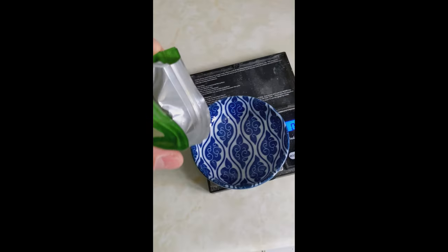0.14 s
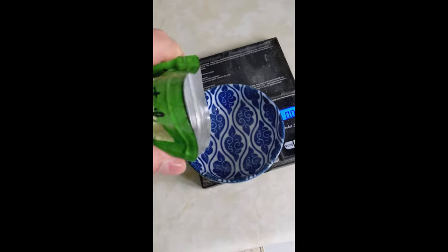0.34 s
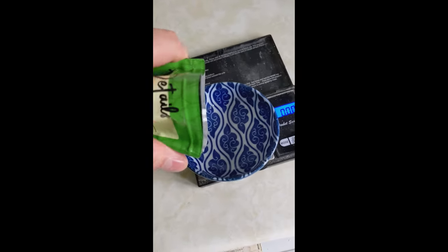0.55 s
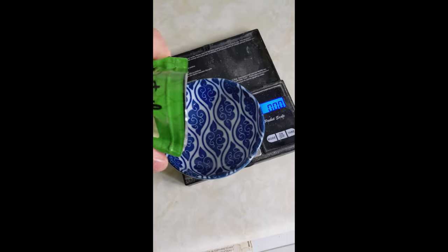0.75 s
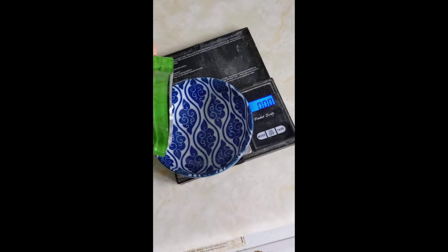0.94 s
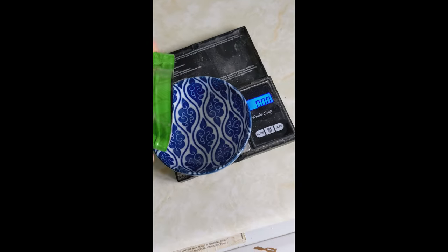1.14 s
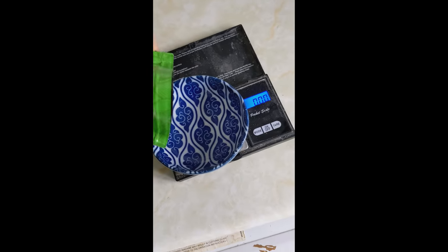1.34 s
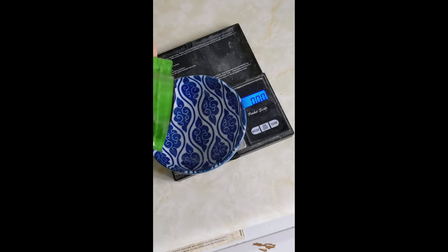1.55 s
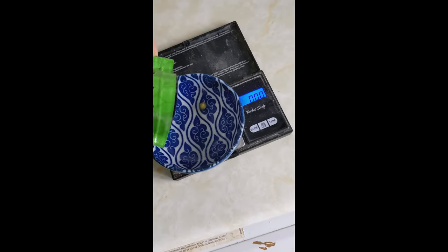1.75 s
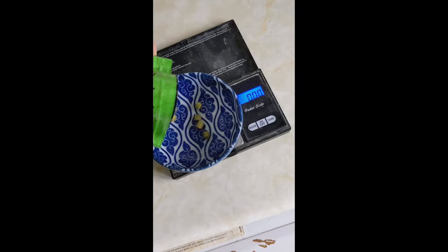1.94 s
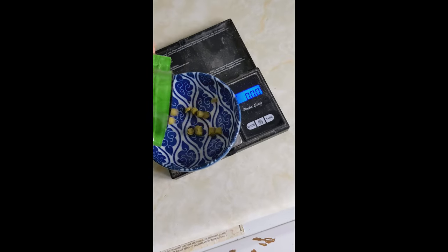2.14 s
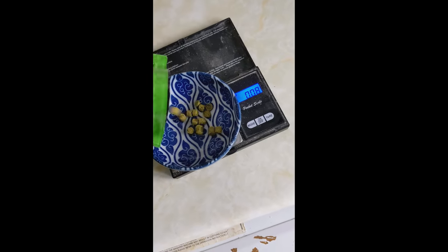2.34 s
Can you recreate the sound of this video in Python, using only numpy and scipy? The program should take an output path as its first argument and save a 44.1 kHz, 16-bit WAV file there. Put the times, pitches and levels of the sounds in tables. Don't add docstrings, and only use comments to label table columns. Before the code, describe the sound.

Crinkling plastic bag handled up close, then shaken so dry bits patter into a small bowl

```python
import sys
import numpy as np
from scipy import signal
from scipy.fft import rfft, irfft
from scipy.io import wavfile
from scipy.ndimage import uniform_filter1d

SR = 44100
rng = np.random.default_rng(int(sys.argv[2]) if len(sys.argv) > 2 else 0)


def voltage_ratio(decibels):
    exponent = np.asarray(decibels, float) / 20
    return 10 ** exponent


def log_audio(samples):
    frames = np.atleast_2d(samples).T
    limited = np.clip(frames, -1, 1)
    pcm = np.round(limited * 32767).astype(np.int16)
    wavfile.write(sys.argv[1], SR, pcm)


N = 110250


def evened(x):
    return x / np.sqrt(np.mean(x ** 2) + 1e-20)


def read(points, hz):
    f, value = np.transpose(points)
    return np.interp(np.log(hz + 1), np.log(f + 1), value)


def causal(db):
    fold = irfft(np.maximum(db, -100) * np.log(10) / 20)
    half = len(fold) // 2
    fold[1:half] *= 2
    fold[half + 1:] = 0
    return irfft(np.exp(rfft(fold)))[:half]


def add(mix, s, sound):
    part = mix[..., max(round(s * SR), 0):][..., :sound.shape[-1]]
    part += sound[..., :part.shape[-1]]


# time in seconds, rustle level in dB.
EFFORT = [(0, -48.5), (.13, -64.5), (.3, -65.5), (.55, -55), (.7, -83), (0.779, -93.5), (.92, -87),
          (1.001, -70), (1.18, -78), (1.271, -66.5), (1.42, -52), (1.519, -77.5), (1.7, -53.5),
          (1.82, -49.5), (1.87, -39.5), (2.08, -41), (2.14, -47.5), (2.5, -61)]


def effort_db():
    s, db = np.transpose(EFFORT)
    return np.interp(np.arange(N) / SR, s, db)


# frequency in Hz, density in dB per Hz.
HUSH_COLOUR = [(28, -20), (55, -5), (130, -9), (350, -35), (1200, -11.5), (7700, -15), (9500, -24.5),
               (15500, -15.5)]
# frequency in Hz, correlation from 0 to 1.
HUSH_SAME = [(60, .5), (250, 0.99), (1500, .05)]
HUSH_DB, HUSH_DB_PER_EFFORT_DB = -74.5, 0.34


def hush():
    hz = np.fft.rfftfreq(N, 1 / SR)
    left, other = rfft(rng.standard_normal((2, N)))
    same = np.clip(read(HUSH_SAME, hz), 0, 1)
    right = same * left + np.sqrt(1 - same ** 2) * other
    hiss = irfft(np.array([left, right]) * voltage_ratio(read(HUSH_COLOUR, hz)), N)
    effort = effort_db()
    return voltage_ratio(HUSH_DB + HUSH_DB_PER_EFFORT_DB * (effort - effort.min())) * evened(hiss)


# frequency in Hz, t60 in seconds.
ROOM_T60 = [(200, 0.82), (800, 0.32), (3000, 0.28), (14000, 0.21)]
ROOM_DB, MOVE_PER_S = -10.5, 2.422


def room_tail():
    taps = np.zeros((2, SR // 2))
    at = np.arange(60, SR // 2 - 20, 20)
    at = at + rng.integers(0, 20, (2, len(at)))
    np.put_along_axis(taps, at, rng.choice([-1., 1.], at.shape), 1)
    hz, t, z = signal.stft(taps, SR, nperseg=256)
    decay = voltage_ratio(-60 * t / read(ROOM_T60, hz)[:, None])
    tail = signal.istft(z * decay, SR, nperseg=256)[1]
    tail[1] = 0.2 * tail[0] + 1.11 * tail[1]
    return tail / np.linalg.norm(tail[0])


def room(x):
    out, turn = np.zeros((2, N)), np.pi * MOVE_PER_S * np.arange(N) / SR
    for k in range(3):
        share = np.sqrt(2 / 3) * np.cos(turn + k * np.pi / 3)
        out += signal.fftconvolve(x * share, room_tail(), axes=1)[:, :N]
    return voltage_ratio(ROOM_DB) * out


COUNTER_S, COUNTER_SHARE, SHADE_HZ = .00074, 0.15, 7200


def bounce(x):
    lag = round(COUNTER_S * SR)
    x = x + COUNTER_SHARE * np.pad(x, ((0, 0), (lag, 0)))[:, :N]
    low = signal.oaconvolve(x[0], signal.firwin(61, SHADE_HZ, fs=SR), "same")
    return np.array([2 * low - x[0], x[1]])


MAX_PLACE_SAMPLES = 3


def placed(x, place):
    return np.array([np.roll(x, max(place, 0)), np.roll(x, max(-place, 0))])


TREBLE_HZ, TREBLE_T60_SHARE = 3860, 0.69
SNAP_DB, MAX_RISE_S = 1, .001
PANEL_OCTAVES, EVEN_DB = .22, 9


def crack(noise, shape, hz, tilt_db, t60, panel_db):
    t, f = np.arange(len(noise)) / SR, np.fft.rfftfreq(2048, 1 / SR) + 1
    t60 = np.clip(t60, .003, .12)
    dull = signal.lfilter(*signal.butter(2, TREBLE_HZ, fs=SR), noise)
    burst = dull * voltage_ratio(-60 * t / t60)
    burst += (noise - dull) * voltage_ratio(-60 * t / (TREBLE_T60_SHARE * t60))
    burst *= 1 - np.exp(-t / np.minimum(MAX_RISE_S, .04 * t60))
    burst[8] += voltage_ratio(SNAP_DB)
    db = read(shape, f) + tilt_db * np.log2(np.maximum(f, 200) / 1500)
    db += panel_db * np.exp(-.5 * (np.log2(f / hz) / PANEL_OCTAVES) ** 2)
    luck_db = uniform_filter1d(20 * np.log10(abs(rfft(burst, 2048)) + 1e-9), size=5)
    db -= np.clip(luck_db - uniform_filter1d(luck_db, size=120), -EVEN_DB, EVEN_DB)
    out = signal.fftconvolve(burst, causal(db))[:len(t)]
    return out / abs(out).max()


# frequency in Hz, density in dB per Hz.
FILM_COLOUR = [(25, -80), (70, -63), (150, -12.5), (600, -5.5), (1300, -9), (3900, -11), (5200, -29.5),
               (9400, -29.5), (15500, -27)]
RUSTLE_DB, GRAINS_PER_S, GRAIN_SPREAD_DB = -0.5, 600, 4.5
GRAIN_T60_S, GRAIN_PANEL_DB = .013, 14


def rustle():
    size = voltage_ratio(GRAIN_SPREAD_DB * np.minimum(rng.exponential(1, N), 3))
    size *= rng.random(N) < GRAINS_PER_S / SR
    kind, out = rng.integers(0, 24, N), np.zeros((2, N))
    for k, hz in enumerate(np.geomspace(450, 2800, 24)):
        grain = crack(rng.standard_normal(2048), FILM_COLOUR, hz, 0, GRAIN_T60_S, GRAIN_PANEL_DB)
        grains = signal.oaconvolve(size * (kind == k), grain)[:N]
        out += placed(grains, rng.integers(-MAX_PLACE_SAMPLES, MAX_PLACE_SAMPLES + 1))
    return evened(out) * voltage_ratio(RUSTLE_DB + effort_db())


# start in seconds, top ring in dB, lower rings in dB.
PELLETS = [(1.7444, -40, -55), (1.8647, -37, -53), (1.9056, -38, -59), (1.9675, -50, -60),
           (2.0073, -43, -57), (2.0433, -40, -57), (2.0607, -39, -54), (2.1620, -70, -57),
           (2.1969, -60, -63), (2.2140, -72, -56), (2.2393, -32, -53), (2.2514, -55, -55),
           (2.2862, -51, -66), (2.3271, -57, -63), (2.3540, -53, -64), (2.3860, -60, -72),
           (2.4409, -46, -68), (2.4843, -62, -68)]
# frequency in Hz, level in dB, t60 in seconds, left minus right in dB.
BOWL_MODES = [(14483, 4, .08, -12), (10830, -1, .11, -4)]
# start in seconds, frequency in Hz, level in dB.
RIM = [
    (1.088, 3600, -70),
    (1.112, 3600, -66),
    (1.8647, 2420, -50),
    (2.0607, 2408, -40),
    (2.1969, 2415, -52),
    (2.2862, 2440, -51),
    (2.365, 2440, -54),
    (2.4843, 2420, -60),
]
RIM_T60_S = .3
TICK_DB, TICK_S, TICK_HZ = 18.5, 0.0041, 5200


def bowl():
    out, t = np.zeros((2, N)), np.arange(16000) / SR
    highpass = signal.butter(2, TICK_HZ, "high", fs=SR)
    for (s, db, low_db), noise in zip(PELLETS, rng.standard_normal((30, 600))):
        for hz, mode_db, t60, pan_db in BOWL_MODES:
            hit_db = db if hz > 12000 else low_db
            ring = voltage_ratio(hit_db + mode_db - 60 * t / t60) * np.sin(2 * np.pi * hz * t)
            add(out, s, ring * voltage_ratio(np.array([[pan_db], [0]])))
        tick = signal.lfilter(*highpass, noise * np.exp(-t[:600] / TICK_S))
        tick_db = TICK_DB + max(low_db - 12.5, db - 24.0)
        add(out, s, voltage_ratio(tick_db) * np.array([0.26 * tick, tick]))
    for s, hz, db in RIM:
        ring = voltage_ratio(db - 60 * t / RIM_T60_S) * np.sin(2 * np.pi * hz * t)
        add(out, s, ring * np.array([[.5], [1]]))
    return out


# frequency in Hz, density in dB per Hz.
CREASE_COLOUR = [(25, -70), (71, -50), (170, -14), (560, -1), (2110, 2.5), (2750, -1), (4140, -7),
                 (6370, -13.5), (8480, -16.5), (16000, -33)]
# start in seconds, peak in dB, panel pitch in Hz,
# tilt in dB per octave, t60 in seconds.
POP = [
    (0.1331, -30.5, 1460, 1.5, 0.009),
    (0.1400, -8, 2560, 6, 0.01),
    (0.1400, -8.5, 715, 0.5, 0.01),
    (0.1399, -11, 4100, 1, 0.006),
    (0.14, -12.5, 1717, 1.5, 0.014),
]
LIFT = [(0.007, -31.5, 1360, -2, 0.022), (0.068, -40.5, 1300, 6, 0.02), (0.215, -21.5, 512, 1, 0.019),
        (0.352, -25.5, 1350, -3, 0.043), (0.372, -18.5, 2040, 3, 0.006), (0.422, -30.5, 1110, -3, 0.042),
        (0.431, -39.5, 568, -7, 0.048), (0.459, -33, 1160, -0.5, 0.017), (0.506, -18, 510, 0.5, 0.027),
        (0.554, -30, 1320, -3.5, 0.028), (0.617, -23, 1096, 0.5, 0.021), (0.644, -38.5, 545, -1.5, 0.034),
        (0.674, -48.5, 563, -6.5, 0.035), (0.719, -42, 700, -2, 0.0094)]
TILT = [(0.932, -25, 1215, 3, 0.029), (0.966, -35, 1826, 0.5, 0.022), (1.0468, -38, 1320, 1, 0.022),
        (1.11, -47.5, 3680, 7.5, 0.031), (1.137, -52, 1165, -4.5, 0.0093), (1.199, -28.5, 562, -1.5, 0.058),
        (1.226, -33.5, 560, 1, 0.027), (1.253, -28, 1180, 1, 0.039), (1.279, -35, 1140, -1, 0.029),
        (1.341, -28.5, 1050, 0.5, 0.06), (1.348, -28, 1310, -0.5, 0.021), (1.351, -33.5, 1270, -1, 0.061),
        (1.3776, -22.5, 1226, 0.5, 0.035), (1.398, -50, 1180, -1, 0.16), (1.548, -34.5, 1080, 1.5, 0.051),
        (1.574, -37, 908, -2.5, 0.064), (1.625, -30, 836, -1, 0.024), (1.657, -43, 534, -5, 0.043)]
SHAKE = [(1.705, -27, 821, -1, 0.025), (1.734, -31, 2450, -1.5, 0.011), (1.769, -30.5, 494, -0.5, 0.044),
         (1.83, -27.5, 3800, -2, 0.014), (1.856, -34.5, 3960, 0.5, 0.03), (1.878, -36, 584, 1, 0.023),
         (1.9035, -22.5, 1260, 1.5, 0.017), (1.928, -18.5, 1400, 2, 0.012), (1.988, -24, 3840, -1, 0.037),
         (2.009, -21.5, 1760, 2, 0.034), (2.043, -27, 1160, 1.5, 0.12), (2.076, -29.5, 594, -0.5, 0.029),
         (2.1524, -24.5, 1620, -0.5, 0.044), (2.176, -30.5, 1260, -0.5, 0.045),
         (2.207, -30.5, 1580, 0.5, 0.042), (2.262, -30, 1280, 2.5, 0.043), (2.286, -35.5, 736, -2, 0.024),
         (2.351, -33, 670, -3.5, 0.023), (2.366, -24, 1310, 0, 0.018), (2.445, -29.5, 1200, -3.5, 0.026)]
POUR = [(1.676, -40, 2100, 1, .012), (1.745, -34, 1960, 1.5, 0.011), (1.781, -36, 890, 0.5, 0.016),
        (0.51, -21, 1530, -2, .02), (0.37, -35, 450, -2, 0.027), (1.691, -37.5, 3900, 0, 0.013),
        (1.837, -32, 470, -4, 0.022), (1.848, -25.5, 1740, -2, 0.023), (1.86, -28, 1740, 0, 0.028),
        (1.962, -29, 610, 3.5, 0.021), (1.9738, -34, 480, -3, 0.025), (2.018, -36, 560, -1, 0.024),
        (2.025, -29, 3900, 1, 0.012), (2.033, -28, 1330, 1, 0.013), (2.0577, -32, 2500, 0, 0.012),
        (2.092, -33, 3300, -0.5, 0.0094), (2.1099, -38, 680, -4.5, .02), (2.2496, -28.5, 1790, 0, 0.021),
        (2.322, -38, 1300, 0, .015), (2.442, -36, 1430, -1, 0.028), (1.9265, -21, 4050, 0, .009),
        (1.8, -27, 600, 1, .015), (1.378, -28.5, 2900, 1, 0.017), (1.2, -31, 3200, 0, 0.012),
        (.933, -30, 616, 0.5, .02), (2.011, -32, 3500, -0.5, .01)]
FOIL = [
    (.081, -43, 8900, 4, 0.0089),
    (0.328, -51, 10000, 14, .005),
    (.414, -54, 12000, 11, .005),
    (0.6716, -46, 8800, 7, 0.007),
    (1.038, -50, 9000, 3, 0.0095),
    (2.334, -43.5, 8000, 6, .01),
    (2.409, -36, 7900, 28, .006),
]
PANEL_DB = 11


def creases():
    out, rows = np.zeros((2, N)), POP + LIFT + TILT + SHAKE + POUR + FOIL
    places = rng.integers(-MAX_PLACE_SAMPLES, MAX_PLACE_SAMPLES + 1, size=90)
    places[:len(POP)] = 0
    noises = rng.standard_normal((90, 4096))
    for (s, db, hz, tilt_db, t60), noise, place in zip(rows, noises, places):
        snap = crack(noise, CREASE_COLOUR, hz, tilt_db, t60, PANEL_DB)
        add(out, s, voltage_ratio(db) * placed(snap, place))
    return out


# frequency in Hz, left minus right in dB.
PORTS = [(150, 0), (400, 4.5), (1200, 1.5), (2400, 4), (3300, 0.5), (6300, -5), (10500, -0.5),
         (14500, -4.5)]
LEFT_LAG_SAMPLES = 10


def at_ports(x):
    half_db = .5 * read(PORTS, np.fft.rfftfreq(1024, 1 / SR))
    lag = np.zeros(LEFT_LAG_SAMPLES)
    ports = np.array([np.r_[lag, causal(half_db)], np.r_[causal(-half_db), lag]])
    return signal.oaconvolve(bounce(x), ports, axes=1)[:, :N]


def top_edge(x, taps, hz):
    edge = signal.firwin(taps, hz, window=("kaiser", 8), fs=SR)[None]
    return signal.oaconvolve(x, edge, "same", axes=1)


BOWL_ROOM_DB, SNAP_EDGE_HZ, SOFT_EDGE_HZ = -2, 16600, 15850


def scene():
    snaps = top_edge(at_ports(creases()), 201, SNAP_EDGE_HZ)
    soft = at_ports(rustle())
    rings = bowl()
    echoes = room(snaps + soft + voltage_ratio(BOWL_ROOM_DB) * rings)
    return snaps + top_edge(soft + echoes + hush() + rings, 301, SOFT_EDGE_HZ)


def roll_off(x):
    return signal.sosfilt(signal.butter(12, 16810, fs=SR, output="sos"), x)


def record(dry):
    return roll_off(dry)


dry = scene()
out = record(dry)
log_audio(out)
```